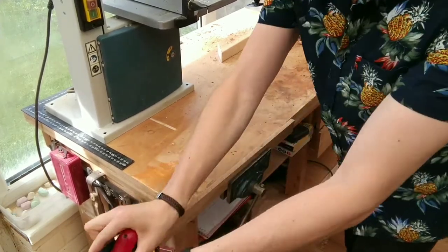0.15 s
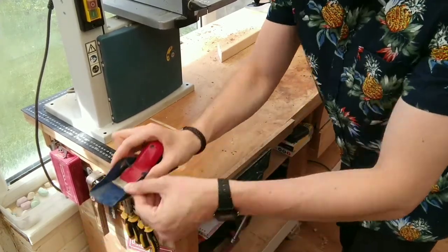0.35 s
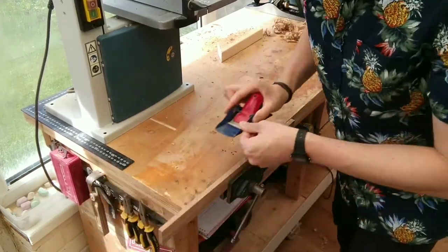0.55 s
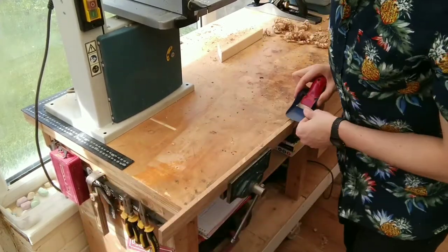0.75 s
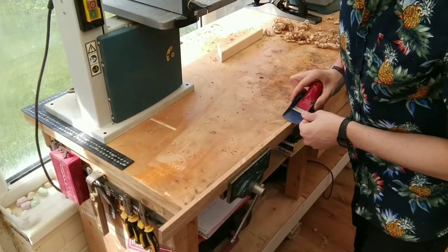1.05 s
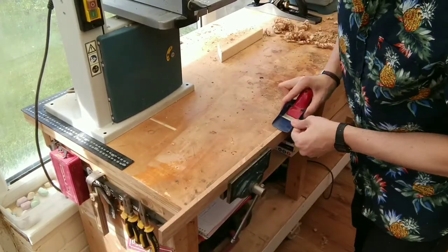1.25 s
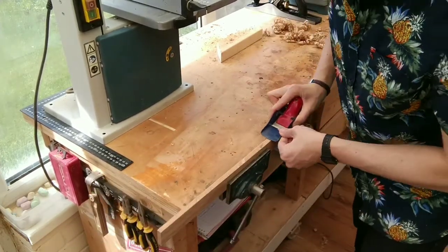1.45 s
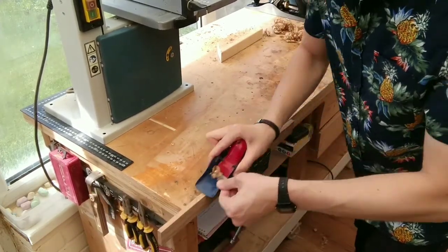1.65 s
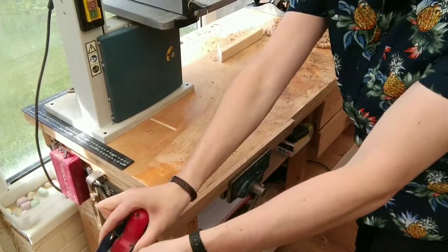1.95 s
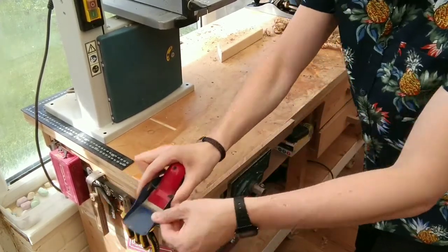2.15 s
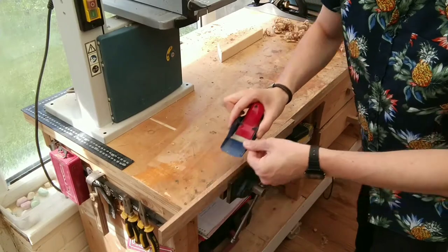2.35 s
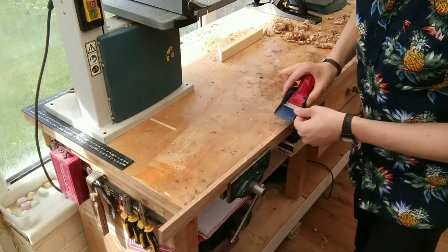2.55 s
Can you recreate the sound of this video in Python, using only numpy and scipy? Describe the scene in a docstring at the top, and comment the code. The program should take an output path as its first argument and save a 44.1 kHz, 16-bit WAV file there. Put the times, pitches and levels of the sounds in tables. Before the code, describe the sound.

Hand plane on a board, thudding on the drawback, then a harsh hissing cut that chatters off.

```python
"""Hand plane on a wooden board

One stroke ends and the plane knocks on the wood, is drawn back with a groan and light scuffs, catches,
then takes a long shaving until the blade chatters off the end of the board in a small workshop.
Tearing fibres are dense random snaps: they hiss through the plane's resonances, make its iron sing and
shake the board's modes and a ringing steel panel; knocks are swelling thumps with short clacks.
Groan and chatter are stick-slip pulses; a motor hums in three harmonics over noise-like air, and echoes ring.
"""
import sys
import numpy as np
from scipy import signal
from scipy.fft import rfft, irfft, next_fast_len
from scipy.io import wavfile
from scipy.ndimage import uniform_filter1d

SR = 44100
rng = np.random.default_rng(int(sys.argv[2]) if len(sys.argv) > 2 else 0)


def master_out(mix):
    """Clip the mix to full scale and print it as 16-bit PCM to the path in sys.argv[1]."""
    frames = np.transpose(np.atleast_2d(mix))
    ceiling = np.clip(frames, -1, 1)
    pcm = np.round(ceiling * 32767).astype(np.int16)
    wavfile.write(sys.argv[1], SR, pcm)


N = 119070

# Planing strokes: hiss of the sole, rumble of the board, rasp of the blade, tearing of the shaving
# start_s, hiss_db, rumble_db, rasp_db, tear_db
ENDING_STROKE = [(0, -18.5, -26, -23.5, -14.5), (.03, -33, -17, -26.5, -37), (.062, -43, -45, -53, -50),
                 (.082, -30, -22, -22, -28), (.13, -37, -56, -30, -44), (.143, -68, -23, -19.5, -67)]
LONG_STROKE = [(1.275, -56.5, -50.5, -61.5, -74), (1.33, -45.5, -38, -49, -63),
               (1.382, -40.5, -40.5, -43, -59), (1.412, -17.5, -33, -21.5, -48),
               (1.444, -23.5, -12.5, -25.5, -42), (1.485, -63.5, -27.5, -38.5, -54.5),
               (1.534, -40.5, -32.5, -42.5, -51), (1.576, -25.5, -9, -22, -38.5),
               (1.61, -13, -19.5, -15.5, -18.5), (1.651, -17.5, -19.5, -20, -20),
               (1.70, -12, -16.5, -22, -17.5), (1.775, -17, -14.5, -23.5, -21),
               (1.885, -13.5, -25.5, -26, -15), (1.933, -20, -35.5, -23.5, -23.5),
               (1.966, -30, -53, -35, -26), (2.051, -43.5, -23.5, -37, -62), (2.11, -70, -41.5, -59, -65)]
STROKE_FADE_S = 0.0043  # the sole meets and leaves the wood gradually
# Resonances of the plane and its blade: pitch_hz, width_hz, lift_db
PLANE_PEAKS = [(541, 90, 5), (775, 63, 5.5), (1426, 74, 10), (1990, 160, -0.5), (2390, 140, 7.5),
               (2900, 98, 5.5), (2920, 110, -11.5), (3923, 53, 15.5), (4194, 210, 11.5), (4606, 60, 12.5),
               (5720, 220, 8.5)]
# Noise colour of the sole's hiss: pitch_hz, density_db (per Hz)
HISS_COLOUR = [(500, -39.5), (1100, -10), (1650, -6.5), (2300, -7.5), (3300, -9), (4200, -8), (6200, -3.5),
               (7300, -7.5), (11000, -6), (13500, -8), (15500, -18.5)]
# Noise colour of the blade's rasp, shared by the chatter: pitch_hz, density_db (per Hz)
RASP_COLOUR = [(150, -19.5), (380, -4), (500, 0.5), (900, 1.5), (1200, -7), (1600, -4), (2000, -14.5),
               (4000, -42.5)]
# Noise colour of the tearing shaving: pitch_hz, density_db (per Hz)
TEAR_COLOUR = [(600, -23.5), (1400, -13), (1900, -11.5), (2700, 11.5), (4700, -1), (6000, -18),
               (9000, -35.5)]
# Colour of the push that makes the board rumble: pitch_hz, density_db (per Hz)
RUMBLE_COLOUR = [(30, -5.5), (100, -5.5), (240, 19.5), (360, 6), (500, -14), (1000, -17), (4000, -33.5)]
# Modes of board and bench, before the loss of deep bass: pitch_hz, level_db, t60_s
BOARD_MODES = [(62, -14, 0.22), (167.9, -1, 0.14), (244.2, -16.5, 0.24), (270.7, -6, 0.11),
               (319, -1.5, 0.08), (449.4, -2.5, 0.12), (520, -1.5, 0.03), (718, -13.5, 0.14),
               (949.6, -6.5, 0.13), (1450, -17.5, 0.04)]
RADIATION_HZ = 111.1  # the board radiates little below this
FIBRES_PER_S, FIBRE_SCATTER_DB = 9000, 4.5
GRAIN_HZ, GRAIN_DB = 166.1, 1.3  # fibres bunch with the grain
PATCH_HZ, PATCH_DB = 70.13, 1.28  # harder and softer patches of wood
SPLINTERS_PER_S, SPLINTER_DB = 240, -15.5  # coarser snaps, level against the fibres

# Singing iron, its resonance shifting with pressure:
# start_s, length_s, from_hz, to_hz, width_hz, level_db
IRON_SINGS = [(-.02, 0.13, 4450, 4380, 850, -33), (1.394, 0.03, 1660, 1440, 380, -24),
              (1.602, 0.056, 1433, 1430, 20, -19), (1.606, .145, 4500, 4750, 98, -29),
              (1.785, 0.16, 4634, 4755, 45, -25.5), (1.864, 0.04, 4080, 4020, 110, -19.5)]
SING_FADE_S = 0.0046

# A steel panel on the bench rings along
PANEL_HZ, PANEL_T60_S = 356.4, 0.67
PANEL_DB, HANDLING_DB = -12, -4.5  # ring against the shaking; light handling shakes it less
PANEL_WAVER, PANEL_WAVER_HZ = 0.0061, 24.76  # pitch unsteadiness as a fraction, and its rate
PANEL_START_DB = -13.49  # shaking already stored from the stroke under way

# Motor hum, levels of three multiples of its turning rate: start_s, fourth_db, fifth_db, sixth_db
MOTOR_HUM = [(0.699, -34.5, -40, -39.5), (1.198, -41.5, -46, -41), (2.3, -43, -53, -45),
             (2.7, -41, -54, -61.5)]
MOTOR_HZ = 23.3
HUM_WAVER_DB, HUM_WAVER_HZ = 1.64, 6.9
# Noise colour of the still air: pitch_hz, density_db (per Hz)
AIR_COLOUR = [(25, -14.5), (60, 6.5), (150, 5), (320, -5), (500, -16.5), (1000, -19.5), (2000, -31),
              (5000, -29), (9000, -36)]
AIR_DB = -48.5

# Knocks of plane on board and board on bench: start_s, thump_db, thump_hz, clack_db
PLANE_KNOCKS = [(.129, 1.5, 255.7, -56), (0.177, -12, 274.6, -21.5), (.292, -3.5, 255, -29),
                (0.308, -7.5, 247, -33), (.326, -3.5, 275, -22), (0.367, -17.5, 292, -30),
                (1.084, -20, 245, -41), (1.112, -32, 287, -44), (1.426, -15, 191, -12),
                (1.437, -24, 243, -11), (1.4471, -7.5, 170, -10.5), (1.466, -8.5, 164, -20),
                (1.568, -18.5, 245, -42), (1.941, -29.5, 178, -22), (1.952, -17.5, 175.4, -12.5),
                (1.971, -22, 69.6, -23), (2.26, -25.5, 310.5, -51), (2.283, -30, 267, -41)]
THUMP_RISE_S, THUMP_SHAPE, CLACK_S = 0.0088, 3.7, 0.00058  # a higher shape narrows the swell

# Light scuffs of sole and fingers: start_s, rise_s, length_s, hiss_db, wood_db, sizzle_db
LIGHT_SCUFFS = [(0.229, 0.061, 0.096, -39, -39, -46), (0.433, 0.02, 0.095, -56.5, -56, -50.5),
                (0.575, 0.005, 0.034, -39, -44.5, -40.5), (0.704, 0.011, 0.044, -56, -52.5, -49),
                (0.76, 0.021, 0.042, -40.5, -45, -46), (0.875, 0.014, 0.035, -47, -47, -54),
                (1.057, 0.039, 0.12, -57, -42, -88), (2.47, 0.036, 0.057, -57.5, -45, -47)]
SCUFF_FALL_S = 0.022
# Noise colour of the scuffs' thin hiss: pitch_hz, density_db (per Hz)
SCUFF_COLOUR = [(120, -65), (500, -7), (1500, 0), (2500, -6), (4000, 6), (5500, 5), (7500, -5), (11000, -8),
                (15500, -41)]
# Noise colour of their fine sizzle: pitch_hz, density_db (per Hz)
SIZZLE_COLOUR = [(500, -67), (5000, -3), (8000, -5.5), (11000, -0.5), (14000, -6), (15500, -11)]
# Noise colour of their rub on the wood: pitch_hz, density_db (per Hz)
RUB_COLOUR = [(60, -9.5), (200, -2), (320, 4), (450, -18), (700, -9.5), (1100, -12.5), (1600, -26),
              (5000, -45)]

# The sole sticks and slips as it starts back: start_s, level_db
JUDDER_LEVELS = [(.266, -20.5), (.285, -20.5), (.305, -10), (.33, -11.5), (.35, -41.5), (.385, -28.5)]
# Colour of the groan: pitch_hz, density_db (per Hz)
GROAN_COLOUR = [(100, -17), (240, -1.5), (340, 16), (470, -1.5), (700, -1), (1000, -21), (1500, -19.5),
                (2200, -25.5), (5000, -37.5), (12000, -69)]
# Resonances of the groan: pitch_hz, width_hz, lift_db
GROAN_RESONANCES = [(318, 67, 10.4), (783, 160, 8.2), (1464, 74, 10.5), (1700, 110, 9.2)]
JUDDER_HZ = 234
SLIP_JITTER, SLIP_JITTER_HZ, SLIP_GRIT_DB = .035, 234, -7.5  # fraction, rate, grit against pulses

# Blade chattering ever more slowly off the end of the board: start_s, slip_hz, level_db
BLADE_CHATTER = [(1.913, 557, -18), (1.934, 477, -15), (1.943, 468, -13.5), (1.964, 418, -25)]

# The workshop: pitch_hz, t60_s, echo_db (against direct sound), width (left-right difference, 0 to 1)
WORKSHOP = [(100, 1, -6, 0), (260, 0.46, -8.5, 0), (665, 0.31, -2.5, 0.76), (1510, 0.3, 1.5, 1.),
            (4940, 0.32, -1, 0.91), (13000, 0.29, -3, 0.5)]
ECHO_DELAY_S, LEFT_LEAD_S, LEFT_LIFT_DB = .004, 0.00019, 0.5
TOP_HZ = 15300
SIDES = np.array([[1], [-1]])  # left, right


def undb(db):
    """Decibels to gain."""
    return 10 ** (np.asarray(db) / 20)


def unit(x):
    """Scale to rms 1."""
    return x / np.sqrt(np.mean(x ** 2))


def over_hz(f, hz, values):
    """Read points on a log-frequency axis."""
    return np.interp(np.log(f + 1), np.log(hz), values)


def colour(x, points, peaks=()):
    """Filter by a smooth spectrum with resonances on top; rms 1."""
    size = next_fast_len(N + SR // 4, True)
    f = np.arange(size // 2 + 1) * SR / size
    gain = undb(over_hz(f, *np.array(points).T))
    lift = 1 + sum((undb(db) - 1) / (1 + 2j * (f - hz) / width) for hz, width, db in peaks)
    return unit(irfft(rfft(x, size) * gain * lift, size)[..., :N])


def walk(hz):
    """Smooth random wander with rms 1, drawing a new target hz times a second."""
    k = int(SR / hz)
    held = rng.standard_normal(N)[np.arange(N) // k]
    return unit(uniform_filter1d(held, k))


def fibres(channels=1):
    """Dense tiny snaps of unequal size, bunched by the grain; each channel can have its own."""
    shape = (channels, N)
    struck = rng.random(shape) < FIBRES_PER_S / SR
    sizes = rng.standard_normal(shape) * undb(FIBRE_SCATTER_DB * rng.standard_normal(shape))
    wood_db = GRAIN_DB * walk(GRAIN_HZ) + PATCH_DB * walk(PATCH_HZ)
    return np.squeeze(struck * sizes) * undb(wood_db)


def board(push):
    """The board and bench ring in decaying modes and radiate little deep bass."""
    t = np.arange(SR) / SR
    ring = sum(undb(db) * np.sin(2 * np.pi * hz * t) * np.exp(-np.log(1000) * t / t60)
               for hz, db, t60 in BOARD_MODES)
    ring = signal.sosfilt(signal.butter(2, RADIATION_HZ, "high", fs=SR, output="sos"), ring)
    return signal.fftconvolve(push, ring)[:N]


def strokes(t):
    """Fibre snaps become hiss, tearing, rasp and rumble as plane and board filter them; hiss is stereo."""
    levels = np.zeros((4, N))
    for rows in map(np.array, (ENDING_STROKE, LONG_STROKE)):
        times = rows[:, 0]
        outside = np.maximum(times[0] - t, 0) + np.maximum(t - times[-1], 0)
        gains = undb([np.interp(t, times, column) for column in rows.T[1:]])
        levels += np.exp(-outside / STROKE_FADE_S) * gains
    hiss, rumble, rasp, tear = levels
    splinters = unit((rng.random(N) < SPLINTERS_PER_S / SR) * rng.uniform(-1, 1, N))
    snaps = unit(fibres()) + undb(SPLINTER_DB) * splinters
    shaving = tear * colour(snaps, TEAR_COLOUR, PLANE_PEAKS)
    sole = hiss * colour(fibres(channels=2), HISS_COLOUR, PLANE_PEAKS)
    deep = rumble * unit(board(colour(fibres(), RUMBLE_COLOUR)))
    blade = rasp * colour(fibres(), RASP_COLOUR, PLANE_PEAKS)
    return sole + shaving, deep + blade


def sings(t):
    """Snapping fibres drive a narrow resonance of the iron, which glides while it lasts."""
    out = np.zeros(N)
    for start, length, from_hz, to_hz, width, db in IRON_SINGS:
        glide_hz = np.interp(t, [start, start + length], [from_hz, to_hz])
        turn = np.exp(2j * np.pi * np.cumsum(glide_hz) / SR)
        # shift the resonance to zero frequency, filter it there, then shift it back
        narrow = signal.butter(2, width / 2, fs=SR, output="sos")
        ring = np.real(turn * signal.sosfilt(narrow, fibres() / turn))
        fade_in = np.clip((t - start) / SING_FADE_S, 0, 1)
        bite = fade_in * np.exp(-np.maximum(t - start - length, 0) / SING_FADE_S)
        out += undb(db) * bite * ring / np.sqrt(np.average(ring ** 2, weights=bite ** 2))
    return out


def panel(shake):
    """One long narrow ring stores the energy of whatever shakes the bench and lets it go slowly."""
    keep = np.exp(-2 * np.log(1000) / (PANEL_T60_S * SR))  # share of energy kept per sample
    stored = undb(PANEL_START_DB) ** 2 * keep ** np.arange(N)
    energy = signal.lfilter([1 - keep], [1, -keep], shake ** 2) + stored
    pitch_hz = PANEL_HZ * (1 + PANEL_WAVER * walk(PANEL_WAVER_HZ))
    phase = 2 * np.pi * np.cumsum(pitch_hz) / SR
    return undb(PANEL_DB) * np.sqrt(2 * energy) * np.sin(phase)


def background(t):
    """Three motor harmonics add into a throb once a turn, over the still air of the room."""
    times, *levels = np.array(MOTOR_HUM).T
    turn = 2 * np.pi * MOTOR_HZ * t
    hum = sum(np.sqrt(2) * undb(np.interp(t, times, db)) * np.cos(order * turn)
              for order, db in zip((4, 5, 6), levels))
    hum = hum * undb(HUM_WAVER_DB * walk(HUM_WAVER_HZ))
    mid, side = (colour(rng.standard_normal(N), AIR_COLOUR) for _ in range(2))
    # the deep air stays central
    side = signal.sosfilt(signal.butter(1, 700, "high", fs=SR, output="sos"), side)
    return hum + undb(AIR_DB) * (mid + side * SIDES)


def knocks(t):
    """Each knock is a soft thump of the clamped board and a short hard push on its modes."""
    thumps, push = np.zeros(N), np.zeros(N)
    for start, thump_db, hz, clack_db in PLANE_KNOCKS:
        age = np.maximum(t - start, 0)
        swell = (age / THUMP_RISE_S * np.exp(1 - age / THUMP_RISE_S)) ** THUMP_SHAPE
        thumps -= undb(thump_db) * swell * np.sin(2 * np.pi * hz * age)
        # half a sine whose samples sum to 1
        half_sine = np.sin(np.pi * np.minimum(age / CLACK_S, 1)) * np.pi / (2 * CLACK_S * SR)
        push += undb(clack_db) * half_sine
    return thumps + board(push)


def scuffs(t):
    """Brief light rubs snap fibres into a thin hiss, a fine sizzle and a little wood."""
    hiss, wood, sizzle = np.zeros((3, N))
    for start, rise, length, hiss_db, wood_db, sizzle_db in LIGHT_SCUFFS:
        swell = np.clip((t - start) / rise, 0, 1) ** 2
        touch = swell * np.exp(-np.maximum(t - start - length, 0) / SCUFF_FALL_S)
        hiss += undb(hiss_db) * touch
        wood += undb(wood_db) * touch
        sizzle += undb(sizzle_db) * touch
    thin = hiss * colour(fibres(channels=2), SCUFF_COLOUR)
    fine = sizzle * colour(fibres(channels=2), SIZZLE_COLOUR)
    return thin + fine, wood * colour(fibres(), RUB_COLOUR)


def stick_slip(hz):
    """Friction lets go in uneven pulses with grit between them."""
    cycles = np.cumsum(hz * (1 + SLIP_JITTER * walk(SLIP_JITTER_HZ))) / SR
    pulses = np.diff(np.floor(cycles), prepend=0)
    return unit(pulses) + undb(SLIP_GRIT_DB) * unit(fibres())


def judder(t):
    """A short groan as the sole sticks and slips on its way back."""
    times, db = np.array(JUDDER_LEVELS).T
    level = undb(np.interp(t, times, db, left=-np.inf, right=-np.inf))
    return level * colour(stick_slip(JUDDER_HZ), GROAN_COLOUR, GROAN_RESONANCES)


def chatter(t):
    """A falling, woody clunk of slowing slips as the shaving breaks free."""
    times, hz, db = np.array(BLADE_CHATTER).T
    level = undb(np.interp(t, times, db, left=-np.inf, right=-np.inf))
    return level * colour(stick_slip(np.interp(t, times, hz)), RASP_COLOUR)


def workshop(x, left_lift_db):
    """Direct sound reaches the left first; a short diffuse echo follows, wide in the treble."""
    hz, t60, echo_db, width = np.array(WORKSHOP).T
    # noise tails that decay at their own rate in each band
    f, age, tails = signal.stft(rng.standard_normal((2, SR)), SR, nperseg=512)
    rate = np.log(1000) / over_hz(f, hz, t60)[:, None]
    tails = signal.istft(tails * np.exp(-rate * age) * np.sqrt(2 * rate / SR), SR)[1]
    f = np.arange(N + 1) * SR / (2 * N)
    mid, side = rfft(tails, 2 * N) * np.exp(-2j * np.pi * f * ECHO_DELAY_S)
    wet = undb(over_hz(f, hz, echo_db))
    wide = np.clip(over_hz(f, hz, width), 0, 1)
    direct = undb(SIDES * left_lift_db / 2) * np.exp(1j * np.pi * f * LEFT_LEAD_S * SIDES)
    echo = wet * (mid + SIDES * wide * side) / np.hypot(1, wide)
    # level the sum of direct sound and echo
    return irfft(rfft(x, 2 * N) * (direct + echo) / np.hypot(1, wet))[:, :N]


def scene():
    """Plane and board in the workshop, over the hum and air."""
    t = np.arange(N) / SR
    cut_hiss, cut_wood = strokes(t)
    rub_hiss, rub_wood = scuffs(t)
    handling = rub_wood + knocks(t) + judder(t)
    ring = panel(cut_wood + undb(HANDLING_DB) * handling)
    planing = cut_hiss + cut_wood + sings(t) + chatter(t)
    return workshop(planing + rub_hiss + handling + ring, LEFT_LIFT_DB) + background(t)


def record(dry):
    """Clip at full scale, then cut the top with a steep low-pass."""
    low_pass = signal.ellip(8, .2, 80, TOP_HZ, fs=SR, output="sos")
    return signal.sosfilt(low_pass, np.clip(dry, -1, 1))


dry = scene()
out = record(dry)
master_out(out)
```